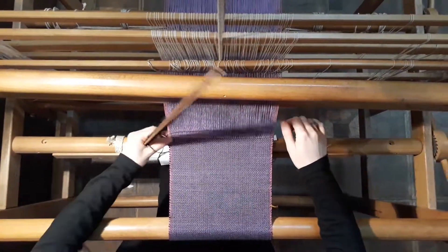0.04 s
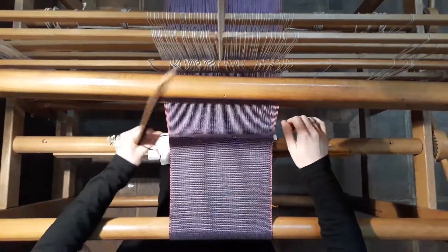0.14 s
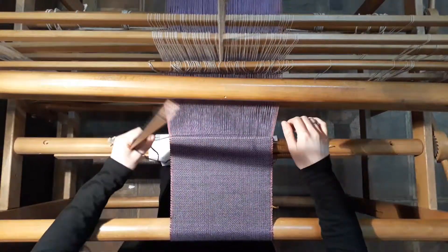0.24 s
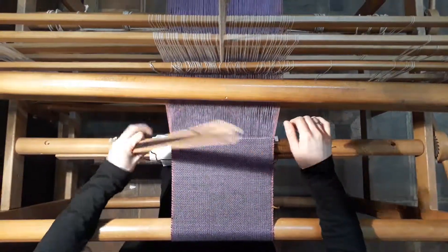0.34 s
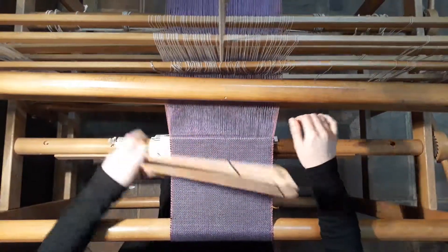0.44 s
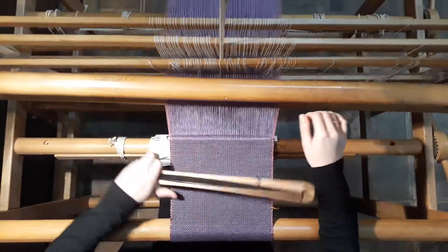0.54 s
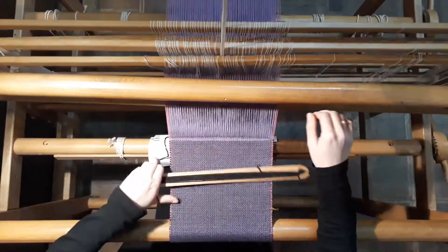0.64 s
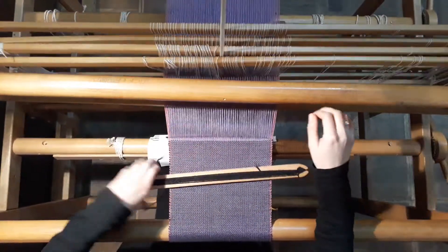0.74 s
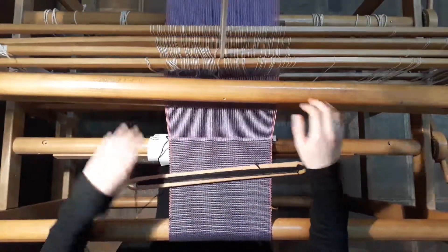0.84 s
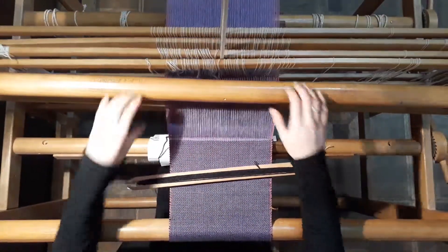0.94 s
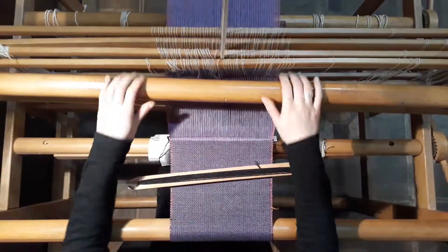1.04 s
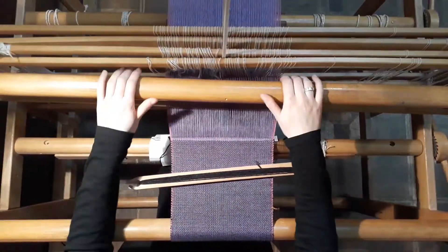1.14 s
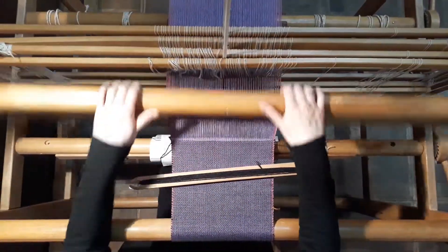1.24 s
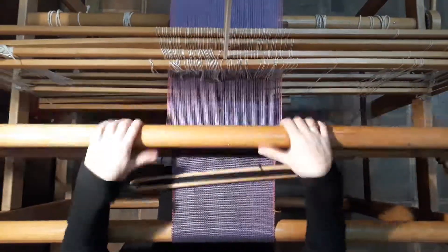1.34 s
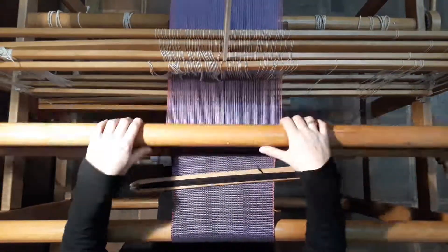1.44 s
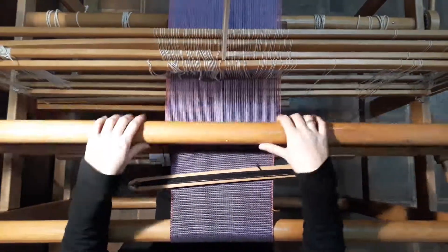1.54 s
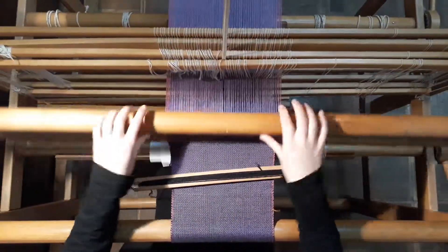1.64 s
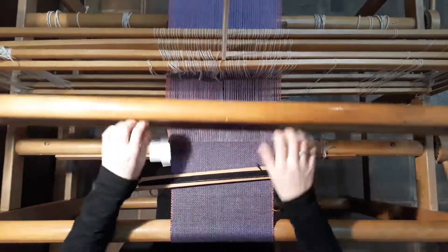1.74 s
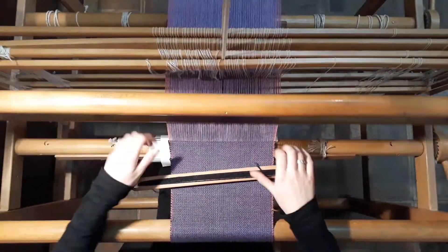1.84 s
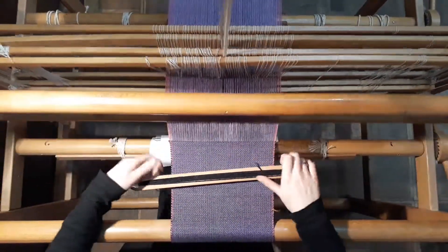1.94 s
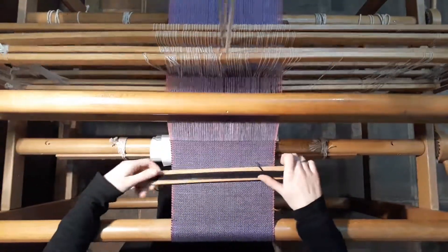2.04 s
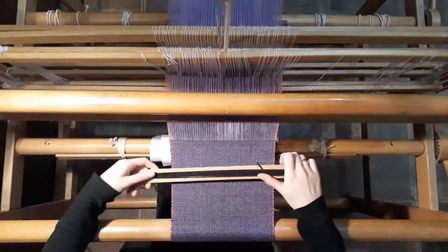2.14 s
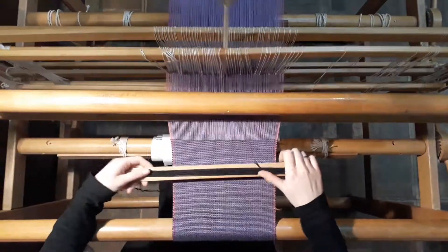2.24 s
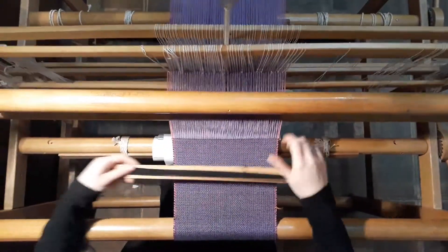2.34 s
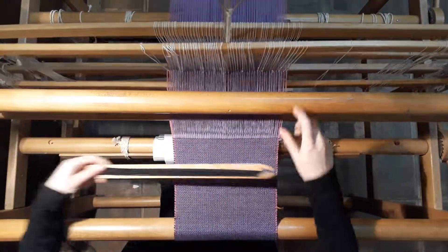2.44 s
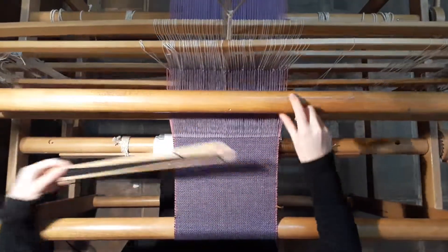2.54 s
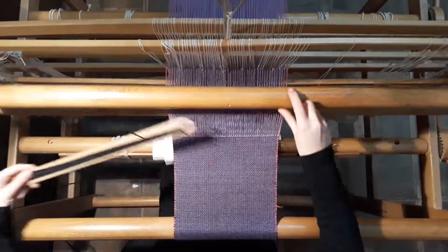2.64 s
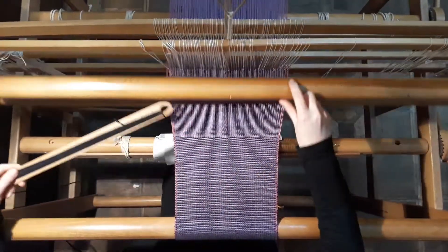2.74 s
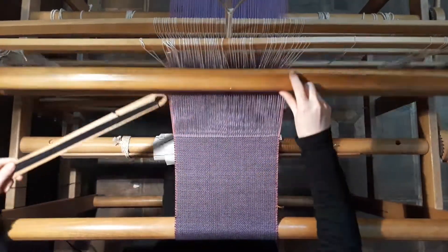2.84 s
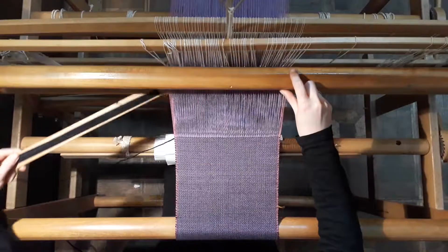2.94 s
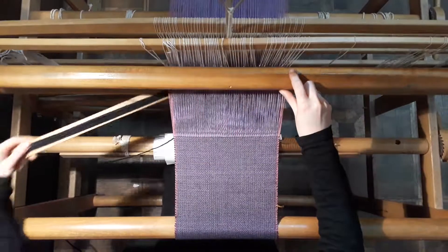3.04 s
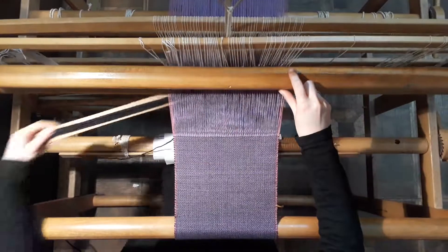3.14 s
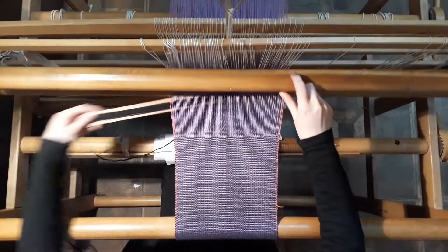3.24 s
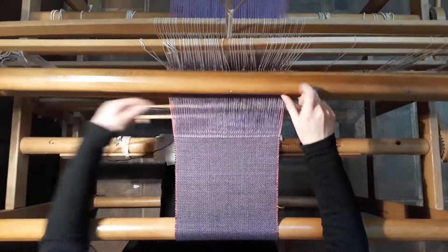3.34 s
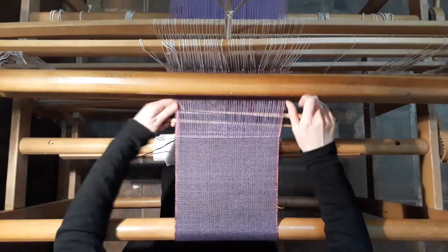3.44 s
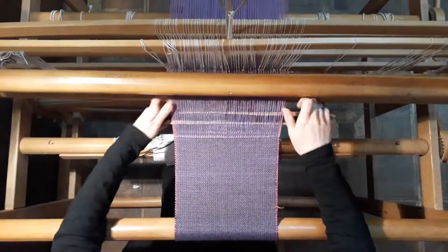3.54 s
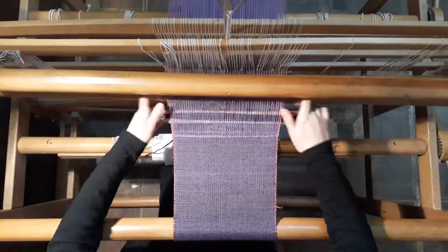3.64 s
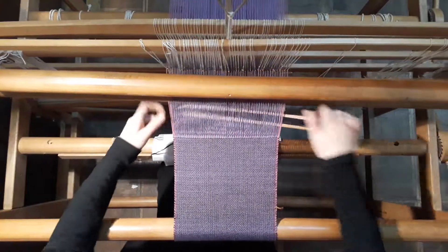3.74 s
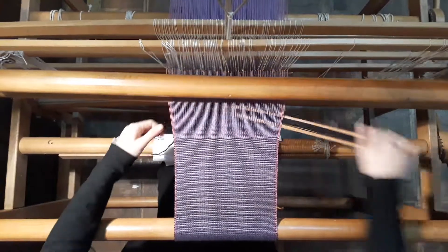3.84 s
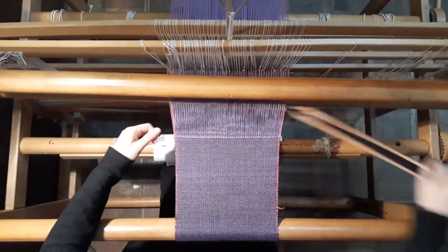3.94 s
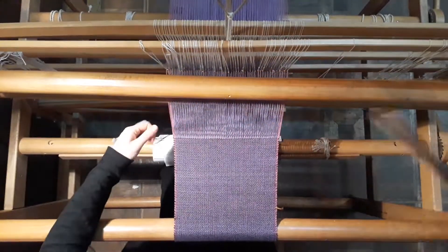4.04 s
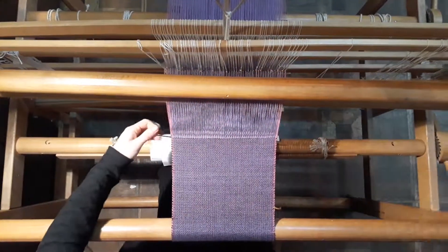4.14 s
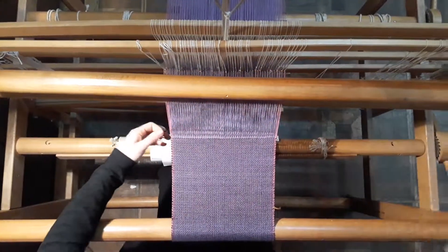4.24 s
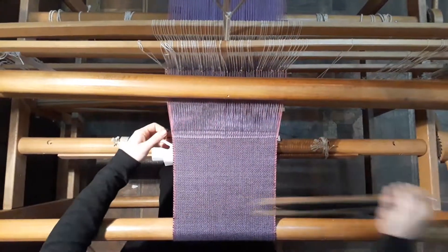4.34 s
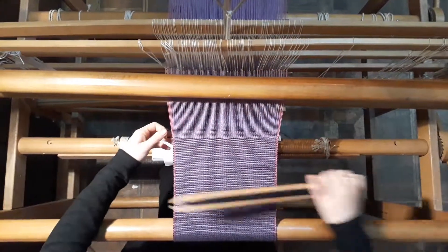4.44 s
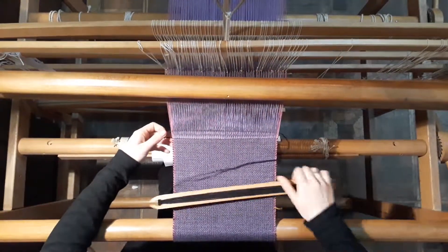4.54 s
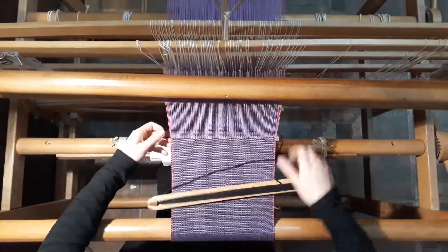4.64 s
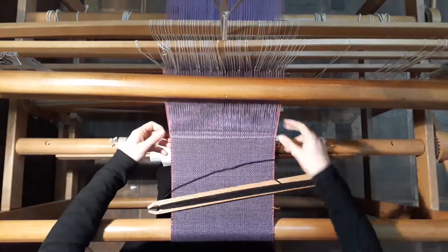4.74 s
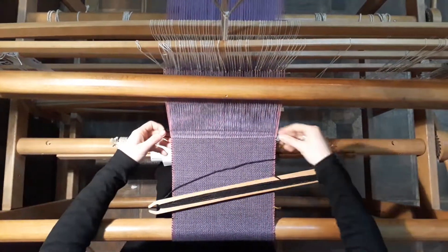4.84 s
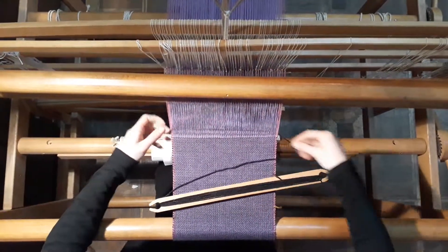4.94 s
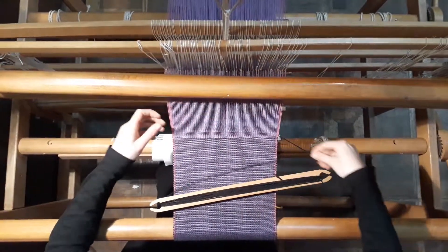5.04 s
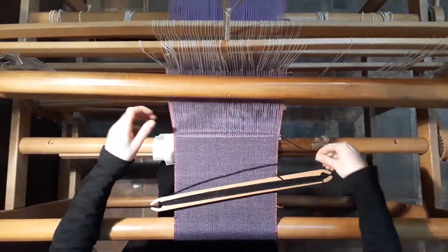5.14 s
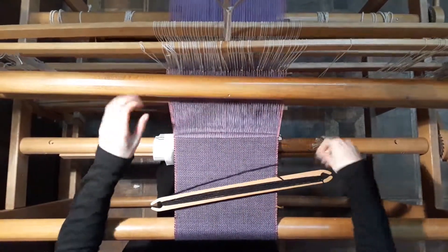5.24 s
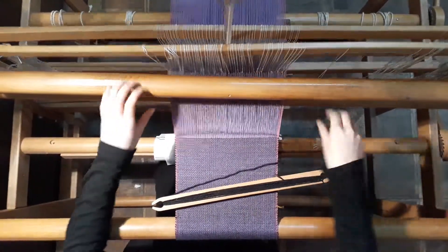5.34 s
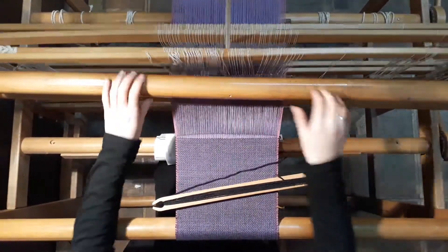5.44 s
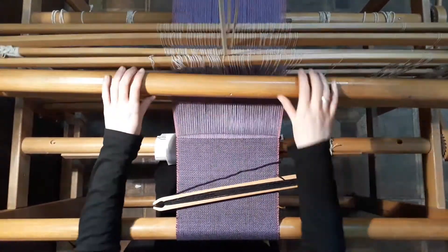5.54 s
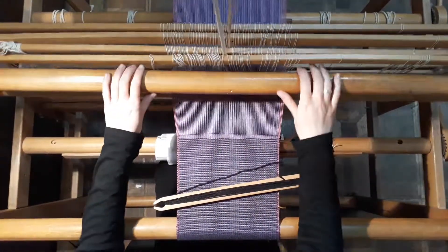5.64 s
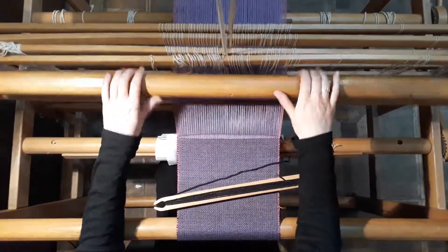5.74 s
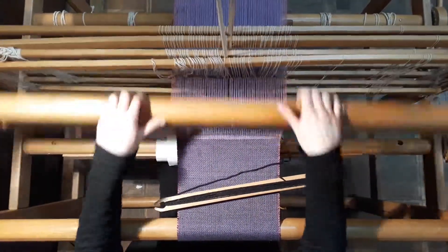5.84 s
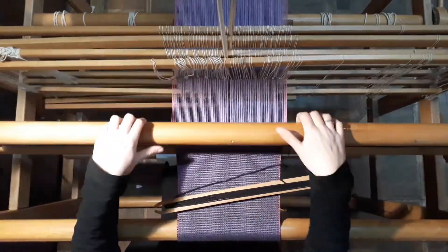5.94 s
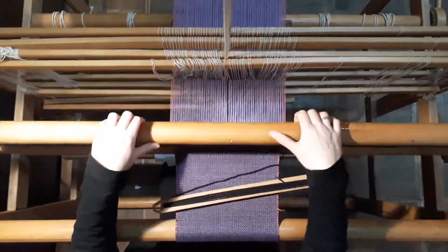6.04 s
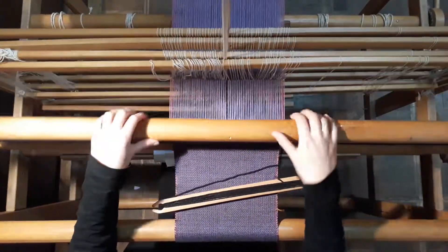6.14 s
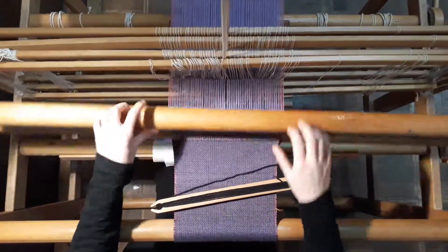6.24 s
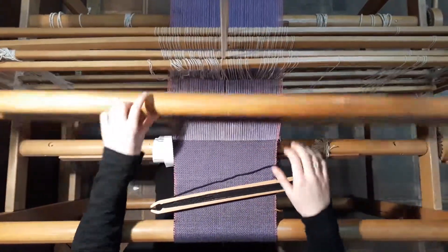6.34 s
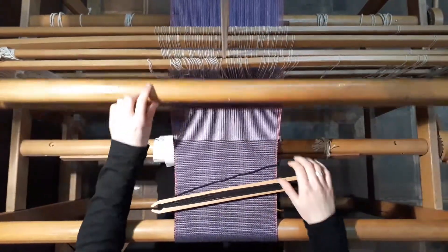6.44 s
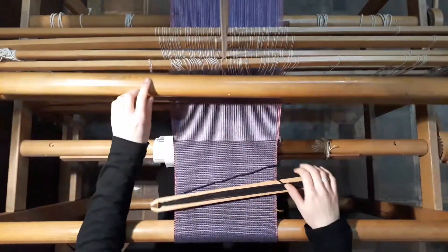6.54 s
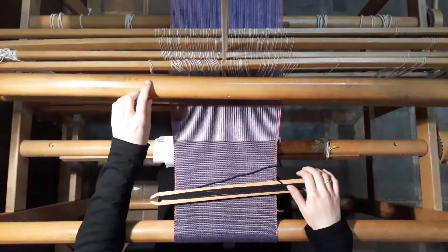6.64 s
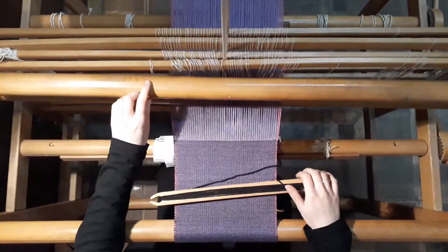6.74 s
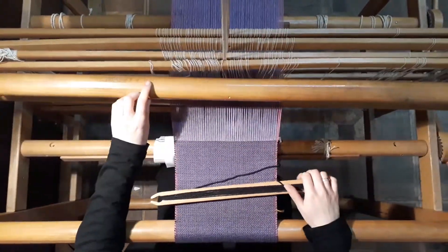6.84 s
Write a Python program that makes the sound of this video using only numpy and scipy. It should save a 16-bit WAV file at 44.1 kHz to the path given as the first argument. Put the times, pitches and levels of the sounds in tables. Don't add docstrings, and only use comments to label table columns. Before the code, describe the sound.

A hand-worked wooden loom knocks and rattles in a small hard room, two heavy beater strokes separated by quiet rustles and light shuttle taps.

```python
import sys
import numpy as np
from scipy import signal
from scipy.fft import rfft, irfft, next_fast_len
from scipy.io import wavfile
from scipy.ndimage import uniform_filter1d

SR = 44100
rng = np.random.default_rng(int(sys.argv[2]) if len(sys.argv) > 2 else 0)


def elevation(decibels):
    levels = np.asarray(decibels, float)
    return 10 ** (levels / 20)


def master_out(mix):
    frames = np.transpose(np.atleast_2d(mix))
    ceiling = np.clip(frames, -1, 1)
    pcm = np.round(ceiling * 32767).astype(np.int16)
    wavfile.write(sys.argv[1], SR, pcm)


N = 303408


def evened(x):
    return x / np.sqrt(np.mean(x ** 2) + 1e-20)


def read(points, hz):
    f, value = np.transpose(points)
    return np.interp(np.log(hz + 1), np.log(f + 1), value)


def colour(x, points):
    length = x.shape[-1]
    size = next_fast_len(length)
    gain = elevation(read(points, np.fft.rfftfreq(size, 1 / SR)))
    return irfft(rfft(x, size) * gain, size)[..., :length]


def add(mix, s, sound, lag=0):
    for side, sign in enumerate((1, -1)):
        part = mix[side, round(s * SR) + max(sign * lag, 0):][:len(sound)]
        part += sound[:len(part)]


def ring(hz, db, t60, seconds, phase=0.):
    t = np.arange(round(seconds * SR), dtype=np.float32)[:, None] / SR
    fall = np.exp(t * np.float32(-np.log(1000) / t60))
    wave = np.sin(t * np.float32(2 * np.pi * hz) + np.float32(2 * np.pi * phase))
    return (fall * wave) @ elevation(db)


def onset(length, rise_s):
    return 1 - np.exp(-np.arange(length) / SR / rise_s)


def grains(per_s, spread_db, ring_s=.012):
    luck = rng.random((2, N)) * SR / per_s + 1e-9
    size = elevation(spread_db * np.clip(-np.log(luck), 0, 4)) * (luck < 1)
    power = signal.lfilter([1], [1, -elevation(-120 / (ring_s * SR))], size ** 2)
    return np.sqrt(power) * rng.standard_normal((2, N))


def patchy(depth_db, seconds):
    span = round(seconds * SR)
    drift = uniform_filter1d(uniform_filter1d(rng.standard_normal(N), span), span)
    return elevation(depth_db * evened(drift))


def swell(peak_s, db, rise_s, fall_s):
    steps = np.arange(0, N + 128, 128)
    late = steps[:, None] / SR - peak_s
    power = elevation(db + 20 * np.where(late < 0, late / rise_s, -late / fall_s)) ** 2
    return np.interp(np.arange(N), steps, np.sqrt(power.sum(1)))


# pitch_hz, level_db
ROOM_TONE = [(12, -46), (20, -27.5), (74, -11.5), (93, -13), (126, -1), (176, -19.5), (325, -28),
             (354, -26), (467, -29), (2950, -43.5), (4730, -46.5), (5750, -49.5), (8040, -36.5),
             (15700, -42.5)]
ROOM_TONE_DB = -67


def still_room():
    return elevation(ROOM_TONE_DB + 3.0) * evened(colour(rng.standard_normal((2, N)), ROOM_TONE))


# start_s, length_s, first_hz, last_hz, level_db
HUM = [
    (2.86, 0.515, 131.4, 146.7, -58),
    (5.05, 0.33, 141.8, 133, -64),
]


def hum():
    out = np.zeros((2, N))
    for s, length, first_hz, last_hz, db in HUM:
        hz = np.linspace(first_hz, last_hz, round(length * SR))
        tone = np.sin(2 * np.pi * np.cumsum(hz) / SR)
        add(out, s, np.sqrt(2) * elevation(db) * tone * np.hanning(len(hz)))
    return out


# pitch_hz, t60_s
WALLS = [(120, 0.42), (330, 0.84), (870, 0.58), (2300, 0.64), (6000, 0.48), (14000, 0.26)]


def walls(x):
    taps = np.zeros((2, SR))
    at = np.arange(180, SR - 20, 20) + rng.integers(0, 20, (2, (SR - 181) // 20))
    np.put_along_axis(taps, at, rng.choice([-1., 1.], at.shape), 1)
    hz, t, z = signal.stft(taps, SR, nperseg=256)
    fading = z * elevation(-60 * t / read(WALLS, hz)[:, None])
    tail = signal.istft(fading, SR, nperseg=256)[1]
    return signal.fftconvolve(x.mean(0)[None], tail / np.linalg.norm(tail[0]), axes=1)[:, :N]


# pitch_hz, level_db, t60_s
TREADLE = [(91.5, 1.5, 0.18), (150.3, -10.5, 0.32), (224, -16, 0.17), (275, -15, 0.27), (291.5, -9, 0.21),
           (323, -13.5, .2)]
HEEL_S, HEEL_DB, HEEL_RISE_S = 4.547, -38.5, 0.0066


def heel():
    out, sound = np.zeros((2, N)), ring(*np.transpose(TREADLE), .4, .1)
    add(out, HEEL_S, elevation(HEEL_DB) * sound * onset(len(sound), HEEL_RISE_S))
    return out


# peak_s, rattle_db, build_up_s, creak_against_rattle_db
SHAKES = [(0.569, -46, 0.075, -10.5), (.67, -50.5, 0.15, -32), (0.778, -42, 0.097, -38),
          (0.886, -29.5, 0.18, -17.5), (1.09, -39, 0.29, -33.5), (1.43, -30, 0.13, -38),
          (1.529, -47, 0.11, 9), (1.63, -37.5, 0.16, -8.5), (1.879, -33.5, 0.084, -46.5),
          (2.052, -38, 0.091, -19), (2.24, -54.5, 0.4, -20.5), (2.49, -48, 1.73, -8.5),
          (2.6, -46, 0.46, -9.5), (2.88, -55, 0.35, -2), (3.401, -64, 0.46, 3.5), (3.15, -78, 0.3, 17.5),
          (3.56, -51.5, 0.47, -24), (3.72, -63, 0.29, -1), (4.499, -78.5, 6.6, 7.5),
          (5.08, -66.5, 0.31, -1), (5.23, -65.5, 0.18, -1.5), (5.46, -38.5, 0.1, -12.5),
          (5.65, -23.5, 0.19, -19), (5.98, -22.5, 0.091, -56), (6.05, -32, 0.18, -9),
          (6.19, -35.5, 0.15, -31), (6.55, -47, 0.35, -46), (6.759, -42.5, 0.75, -10.5)]
# peak_s, rustle_db, build_up_s, dying_s
GESTURES = [(0.05, -65.5, 1, 2.6), (.67, -45, 0.24, 0.51), (1.08, -59, 0.51, 0.48), (1.42, -37, 0.18, 0.25),
            (1.7, -54.5, 0.74, 1.2), (2.04, -42.5, 0.25, 1.16), (2.59, -72, 0.83, 0.11),
            (3.156, -56.5, 0.25, 0.82), (3.45, -51, 0.14, 1.3), (3.76, -43.5, 0.14, 0.24),
            (4.17, -75, 0.3, 0.15), (5.079, -64, 0.27, 1), (5.38, -41.5, 0.19, 0.29),
            (5.65, -49, 0.099, 0.44), (5.98, -35, 0.2, 0.23), (6.3, -57, 0.42, 0.7),
            (6.631, -51, 0.19, 0.15)]
# pitch_hz, level_db (per Hz)
RATTLE = [(290, -41), (500, -5.5), (627, 2), (1630, -1), (2890, -2), (4990, -14.5), (5780, -23.5),
          (8160, -22), (12000, -43.5), (15600, -80), (22000, -120)]
# pitch_hz, level_db (per Hz)
CREAK = [(120, -8.5), (200, 7.5), (400, 1), (800, -8), (1300, -41.5)]
# pitch_hz, level_db (per Hz)
RUSTLE = [(880, -47.5), (1500, -30), (5020, -11), (5540, -10.5), (5880, -12.5), (8050, -7), (9240, -11.5),
          (15700, -7)]
# ratio to the mode, level_db
ROD_BUMP = [(.94, -0.5), (1.0, 2.5), (1.06, 1.5)]
SETTLE_S, CREAK_SETTLE_S = 0.19, 0.23


def motion():
    s, db, rise_s, creak_db = np.transpose(SHAKES)
    bumps = [(hz * ratio, bump_db) for hz, _, _ in ROD[:5] for ratio, bump_db in ROD_BUMP]
    loose = evened(colour(colour(grains(420, 3.8, 0.04), RATTLE), bumps))
    rattle = swell(s, db - 8.0, rise_s, SETTLE_S) * loose
    rubbing = evened(colour(patchy(4.3, 0.036) * grains(410, 1.3, 0.02), CREAK))
    creak = swell(s, db + creak_db - 0.5, rise_s, CREAK_SETTLE_S) * rubbing
    fibres = evened(colour(patchy(2.9, 0.024) * grains(2500, 3.2, 0.011), RUSTLE))
    rustle = elevation(-1.1) * swell(*np.transpose(GESTURES)) * fibres
    return rattle + creak + rustle


# at_s, level_db, resonance_hz
SLIDE = [(2.92, -89, 2870), (2.996, -64.5, 2670), (3.058, -70.5, 2740), (3.214, -62.5, 3100),
         (3.29, -93, 2720), (3.34, -92, 2940)]


def shuttle():
    s, db, hz = np.transpose(SLIDE)
    t = np.arange(N) / SR
    turn = np.exp(2j * np.pi * np.cumsum(np.interp(t, s, hz)) / SR)
    r = np.exp(-np.pi * 850 / SR)
    band = (turn * signal.lfilter([1], [1, -2 * r, r * r], grains(3600, 1.5) / turn)).real
    return elevation(np.interp(t, s, db, -120, -120) + 1.0) * evened(band)


# start_s, peak_db, upper_modes_db
THUDS = [(0.797, -54, -8), (0.882, -45.5, -8), (0.979, -44, 12), (1.378, -25.5, -3), (1.423, -29.5, 11.5),
         (1.452, -16.5, 10), (1.472, -31, -9), (1.84, -47.5, 17.5), (1.947, -43.5, 9.5), (2.601, -54, -12),
         (2.801, -42, -6.5), (4.66, -47.5, 7), (5.632, -34, -3), (5.941, -25, -8), (5.978, -32.5, 15.5),
         (6.011, -18.5, 0.5), (6.046, -37.5, 13), (6.138, -32, -28), (6.66, -43.5, -35)]
# pitch_hz, level_db, t60_s
FRAME = [(50, -20, 0.2), (76.9, -11, 0.27), (109.1, 0, 0.13), (114.4, 7, 0.16), (141.3, -13, 0.51),
         (171.3, -11.5, 0.3), (218, -4, 0.1), (243.3, -3, 0.11), (298, -5.5, 0.068), (330, 11, 0.018)]


def frame():
    out, (hz, mode_db, t60) = np.zeros((2, N)), np.transpose(FRAME)
    for (s, db, upper_db), (phase, load) in zip(THUDS, rng.random((len(THUDS), 2, len(FRAME)))):
        sound = ring(hz * (0.985 + 0.04 * load), mode_db + upper_db * (hz > 185), t60, .4, phase)
        add(out, s - .01, elevation(db - 1.0) * sound * onset(len(sound), 0.043))
    return out


# grip_s, landing_s, shudder_db, softer_at_grip_db
STROKES = [
    (1.404, 1.474, -25.5, -4.5),
    (5.956, 6.037, -27.5, -6),
]
# pitch_hz, level_db (per Hz)
SHUDDER = [(180, -28), (300, -2.5), (528, -2.5), (739, 2), (884, -9), (1190, 0), (1280, -4), (2610, -4.5),
           (6500, -24), (8450, -60), (14300, -120)]
GRIP_S, STOP_S, FIZZ_DB = 0.013, 0.1, -4.5


def beater():
    t, gain = np.arange(N) / SR, 0
    shudder = evened(colour(grains(700, 2.0, 0.0064), SHUDDER))
    fizz = evened(colour(grains(1200, 1.3, 0.0063), RUSTLE))
    for grip, landing, db, soft_db in STROKES:
        times = [grip - 5 * GRIP_S, grip, landing, landing + 5 * STOP_S]
        course_db = np.interp(t, times, [soft_db - 100, soft_db, 0, -100])
        gain = gain + elevation(db - 1.5 + course_db)
    return gain * (shudder + elevation(FIZZ_DB) * fizz)


# start_s, peak_db, third_mode_hz, low_modes_db, sharpness_db
JOLTS = [(0.717, -38, 2738, 1, -22), (0.7658, -50.5, 2740, 19, -15), (0.849, -41, 2670, 7.5, -19),
         (0.8815, -52, 2630, 16, -22), (0.979, -35, 2625, 5, 5.5), (1.065, -51.5, 2590, 12, 10),
         (1.413, -34.5, 2660, -6, -18), (1.476, -45.5, 2630, 10.5, -6), (1.8362, -36, 2656, -1.5, -25),
         (1.9868, -25.5, 2637, -4, 2), (5.4011, -37.5, 2644, -2.5, -19), (5.4873, -35.5, 2627, -1.5, -28),
         (5.964, -30, 2700, -7, -21), (6.015, -39.5, 2634, 12, -7), (6.135, -27.5, 2660, -3, -12),
         (6.7115, -48, 2690, 10.5, -6), (6.5214, -49, 2705, -4, 3)]
# pitch_hz, level_db, t60_s
ROD = [(1186, -2, 0.49), (1823, 2.5, 0.4), (2607, 1, 0.52), (3550, -0.5, 0.2), (4490, -13.5, 0.31),
       (5130, -3, 0.27), (6050, -8, 0.37), (6980, 8.5, 0.037), (8000, -4, 0.16)]
TOP_MODES_DB = -0.5


def rod():
    out, (hz, mode_db, t60) = np.zeros((2, N)), np.repeat(ROD, 5, axis=0).T
    luck = rng.random((len(JOLTS), 2, 3, len(hz)))
    rise = onset(SR * 2 // 5, 0.0004)
    for (s, db, third_hz, low_db, high_db), pair in zip(JOLTS, luck):
        tilt = np.select([hz < 2200, hz < 3000, hz < 5600], [low_db, 0, high_db], high_db + TOP_MODES_DB)
        for side, (split, phase, size) in enumerate(pair):
            part = out[side, round(s * SR):][:len(rise)]
            mode_hz = (hz + (10.6 + 0.055 * hz) * (split - .5)) * third_hz / ROD[2][0]
            sound = ring(mode_hz, mode_db + tilt + 5 * size, t60, len(rise) / SR, phase)
            part += (elevation(db - 17.5) * rise * sound)[:len(part)]
    return out


# start_s, peak_db, lowest_hz
SPARKS = [(1.3585, -37, 7000), (1.4122, -30, 7000), (1.46, -33, 6000), (1.5235, -26, 6500),
          (1.5512, -18, 8500), (3.5406, -41.5, 2000), (5.5552, -33.5, 5500), (5.6048, -35, 3500),
          (5.9255, -28, 7000), (5.949, -34, 8000), (5.961, -29, 7500), (5.9815, -17.5, 7000),
          (6.0482, -15, 6500), (6.0545, -30, 7000), (6.0935, -23, 7000), (6.1475, -23, 6000),
          (0.9764, -32, 5500), (5.0386, -40, 3000), (6.523, -46, 1500), (6.624, -48, 1500),
          (6.7073, -49, 1200)]
SPARK_T60_S, SPARK_ECHO_DB = 0.0053, -8.5


def sparks(size=512):
    out, t = np.zeros((2, N)), np.arange(size) / SR
    for (s, db, low_hz), noise in zip(SPARKS, rng.standard_normal((len(SPARKS), size))):
        crack = evened(colour(noise, [(low_hz * .6, -25), (low_hz, 0), (16000, 3)]))
        add(out, s, elevation(db - 60 * t / SPARK_T60_S) * crack, lag=-8)
    return out


# start_s, peak_db, centre_hz, t60_s
SNAPS = [(0.467, -36.5, 9100, 0.0074), (0.7105, -39.5, 4070, .01), (1.118, -32.5, 10150, 0.0054),
         (1.186, -19, 8600, 0.0022), (1.3685, -42, 5820, 0.0073), (1.416, -30, 8000, 0.0035),
         (1.4135, -20, 2490, 0.013), (1.459, -14, 8000, 0.005), (1.4753, -27, 5240, 0.011),
         (1.55, -24, 10500, 0.0034), (1.734, -34, 3300, 0.0083), (1.754, -38, 3360, 0.01),
         (1.785, -38, 2700, 0.014), (1.8055, -42, 3550, 0.014), (1.836, -29, 3500, 0.012),
         (1.842, -28, 1470, 0.016), (1.864, -37, 3000, 0.011), (1.9857, -17, 6950, 0.011),
         (2.178, -25, 10200, 0.0031), (2.7735, -41, 8000, 0.0086), (2.7813, -25, 3430, 0.0038),
         (0.7675, -34, 1925, 0.021), (3.955, -66, 9500, 0.0067), (3.6131, -33, 3700, 0.0043),
         (3.8059, -26.5, 8000, 0.0049), (3.8088, -40.5, 5150, 0.016), (4.0324, -36, 7700, 0.0037),
         (5.0401, -29, 6600, .005), (5.1007, -27, 5720, 0.0067), (5.134, -34, 6900, 0.0066),
         (5.488, -31, 2240, 0.0061), (5.561, -27.5, 4670, 0.034), (5.605, -8.5, 6340, 0.0057),
         (5.6153, -15, 3000, 0.013), (5.627, -23, 3270, 0.0056), (5.9263, -25, 5700, 0.0039),
         (5.9493, -33, 4930, 0.0056), (5.961, -33, 8500, 0.0039), (5.9818, -12, 8000, 0.0042),
         (6.0158, -15, 7700, 0.0043), (6.0482, -15.5, 7000, 0.0046), (6.053, -20, 8000, 0.0042),
         (6.1475, -31, 8440, 0.0049), (6.3765, -55, 8000, 0.0078), (0.7902, -26.5, 5500, 0.0063),
         (6.45, -34.5, 5500, 0.0065), (6.706, -55, 4440, 0.0038), (6.47, -40, 6440, 0.0083),
         (6.637, -33.5, 9100, 0.0046), (6.6394, -46, 3700, 0.005),
         (0.59, -49, 1200, .015), (0.7175, -36, 2800, .02), (0.8485, -40, 3000, 0.0053),
        (0.7905, -33, 4900, 0.015), (0.99, -20.5, 5400, 0.0056), (1.1, -35, 1400, .008),
        (1.9, -34, 1450, 0.017), (1.462, -21.5, 737, .06), (1.425, -23.5, 3100, .012),
        (6.386, -42, 3840, .008), (6.519, -38, 4200, .006), (1.208, -35.5, 3400, .005),
        (3.352, -58, 1500, .04), (5.2, -56.5, 1400, 0.022), (1.4035, -26, 3670, 0.0094),
        (1.8362, -26, 2100, 0.014), (2.97, -47, 6300, 0.0081), (3.166, -53, 3000, 0.0099),
        (3.206, -61, 2600, 0.011), (3.806, -52, 2300, 0.017), (4.035, -49, 490, 0.11),
        (4.036, -55, 1800, 0.027), (4.741, -50, 530, 0.077), (4.739, -60, 1250, .04),
        (5.556, -18, 3500, 0.0058), (5.557, -25, 1800, 0.014), (5.6015, -23, 3700, 0.0054),
        (5.9172, -34, 4200, .008), (5.9606, -26, 3300, 0.011), (5.65, -33.5, 7700, 0.035)]
# ratio to the centre, level_db
SNAP_MODES = [(.55, 2), (.76, 2.5), (1.01, 8), (1.27, 4), (1.6, -0.5)]
# late_s, level_db
BEAM_ECHOES = [(.0011, -12.5), (.0023, -6.5), (.0032, -12.5), (.0047, -15), (.0066, -22.5)]
SNAP_ECHO_DB, SNAP_RISE_S = -3, .0003
SNAP_DAMPED = 1.6


def snaps():
    out, sent, (ratio, mode_db) = np.zeros((2, N)), np.zeros((2, N)), np.transpose(SNAP_MODES)
    for s, db, hz, t60 in SNAPS:
        spread = ratio ** np.clip(0.005 / t60, .05, 1.2)
        sound = ring(np.minimum(hz * spread, SR / 3), mode_db, t60, t60, ratio ** 2)
        t = np.arange(len(sound)) / SR
        sound = elevation(db - 9) * sound * onset(len(sound), SNAP_RISE_S)
        add(out, s, sound, lag=-8)
        add(sent, s, elevation(7.0 - 60 * SNAP_DAMPED * t / t60) * sound)
        for k, (late_s, echo_db) in enumerate(BEAM_ECHOES):
            add(out, s + late_s, elevation(echo_db) * sound, lag=(-1) ** k * 12)
    return out, sent


# start_s, peak_db, ring_hz, echo_db
TOUCHES = [(0.4075, -66, 7900, 10.5), (6.0485, -29, 4300, -16), (3.494, -54.5, 7660, 2.5),
           (4.1693, -60.5, 8000, 5), (4.5552, -66.5, 7960, 7.5), (5.018, -65.5, 7900, 14.5)]
# start_s, peak_db, ring_hz, echo_db
RAPS = [(3.3482, -48, 7200, 7), (3.8065, -45.5, 7720, -1.5), (4.0333, -49, 7770, 9.5),
        (4.7392, -53, 7500, 7.5)]
# start_s, peak_db, ring_hz, echo_db
TICKS = [(0.4668, -50, 8500, -9), (1.5251, -37, 2500, -8), (2.4659, -37, 2380, 0), (2.9897, -48, 5260, 5),
         (3.2101, -47, 8500, 6.5), (3.5406, -35, 8340, -2), (5.0386, -43, 8010, 1), (5.1007, -36, 8140, -1),
         (5.1327, -44.5, 4860, 9), (5.1474, -47, 3125, -7), (6.1475, -29.5, 8000, -17)]
# start_s, peak_db, ring_hz, echo_db
DROPS = [(2.5119, -23.5, 3710, 0)]
# start_s, peak_db, ring_hz, echo_db
STICKS = [(0.4837, -38, 3984, 2.5), (0.7668, -54, 2080, 6), (1.9859, -22.5, 2720, 11.5),
          (2.1774, -47, 2400, 8), (2.7524, -48.5, 2510, 9), (5.6045, -16, 4800, 7), (6.3844, -43, 3470, 1),
          (6.4486, -35, 3170, 4)]
# start_s, peak_db, ring_hz, echo_db
BLOWS = [(0.9783, -25, 1270, 7), (1.117, -39, 3460, 4.5), (1.1858, -36.5, 4380, 7),
         (1.3678, -22.5, 1970, 1.5), (1.4031, -30, 2120, 5), (1.4601, -19.5, 1030, -13),
         (2.4359, -42, 870, -20), (2.5994, -43, 4450, 7), (2.7804, -34, 1460, 7.5),
         (3.379, -43.5, 1080, -1), (3.613, -34, 3670, -3), (5.1624, -45, 5250, -5),
         (5.5548, -26.5, 1816, 15), (5.9485, -26, 1740, -17), (5.9614, -27, 2180, -14),
         (5.9792, -26, 1150, -4), (6.0147, -21.5, 1210, -2), (6.0935, -25, 1175, 2)]
# start_s, peak_db, ring_hz, echo_db
CLACKS = [(0.7896, -23, 3630, 1), (0.8489, -31, 2000, -7), (0.882, -24, 1216, -13),
          (1.0685, -32, 2580, -11), (1.207, -33.5, 3620, -24), (1.5535, -30.5, 2770, -21),
          (1.734, -42, 3120, 1), (1.7538, -36, 3800, -1), (1.7878, -43, 2500, -19),
          (1.8038, -37.5, 3620, -19), (1.8354, -31, 3520, 10.5), (2.3093, -41.5, 1470, -16),
          (2.6996, -40.5, 2405, -7), (5.4016, -33, 3030, 9), (5.488, -50, 2540, -15),
          (6.1371, -26.5, 2570, 11), (6.625, -31.5, 3740, 4), (0.7163, -36, 2080, -22),
          (6.5212, -32.5, 3800, 4), (6.7073, -27.5, 1970, -2.5)]
# events, treble_db, body_db
KINDS = [(TOUCHES, 7.6, 0), (RAPS, -0.34, 1), (TICKS, -3.5, -43.5), (DROPS, -8, -54),
         (STICKS, -13.5, -13.5), (BLOWS, -11, -3), (CLACKS, -35.5, -3.5)]
TICK_T60_S, RING_TO_WALLS = .012, .13


def knocks(size=2048):
    direct, sent, t = np.zeros((2, N)), np.zeros((2, N)), np.arange(size) / SR
    contact = onset(size, 0.00057)
    rows = [(*row, *kind) for events, *kind in KINDS for row in events]
    noises = rng.standard_normal((len(rows), 2, size))
    for (s, db, ring_hz, far_db, treble_db, body_db), noise in zip(rows, noises):
        bright = [(2500, -31.5), (6000, -7.0), (7500, 1.0), (9000, -5), (11000, -5.0), (16000, -7.5)]
        tick = evened(colour(noise[0], bright)) * elevation(treble_db + 14.5)
        body = [(250, body_db - 27.5), (450, body_db), (1300, body_db),
                (2000, -2.0), (5200, -3), (7000, -27.5)]
        crack = colour(noise[1], body) * elevation(8.5) * contact
        strong_db = np.interp(ring_hz, [1350, 1890, 5500, 6030], [body_db, 0, 0, treble_db - 1])
        tone = ring(np.array([ring_hz]), np.array([strong_db + 1.0]), 0.038, size / SR) * contact
        near = tick * elevation(-60 * t / TICK_T60_S) + crack * elevation(-60 * t / 0.053) + tone
        add(direct, s, elevation(db - 6.5) * near, round(9 * np.tanh(noise[1, -1]) - 5))
        far = tick * elevation(-60 * t / 0.0042) + crack * elevation(-60 * t / 0.024) + RING_TO_WALLS * tone
        add(sent, s, elevation(db - 5.5 + far_db) * far)
    return direct, sent


# pitch_hz, level_db
PORTS = [(60, -1), (250, -3.5), (4600, 2.5), (5250, -1.5), (5620, -8.5), (5900, -3.5), (8000, 1.5),
         (11000, -3), (16000, -12)]


def scene():
    hits, hits_sent = knocks()
    beams = frame() + heel()
    moving = motion() + beater() + shuttle() + rod()
    still = still_room()
    edges, edges_sent = snaps()
    cracks = sparks()
    sent = hits_sent + elevation(SNAP_ECHO_DB) * edges_sent + elevation(SPARK_ECHO_DB) * cracks + elevation(-6.0) * moving
    loom = colour(hits + edges + cracks + moving + walls(sent), PORTS)
    return loom + beams + elevation(-6.0) * walls(beams) + hum() + still


def top_cut(x):
    return signal.sosfilt(signal.butter(12, 16990, fs=SR, output="sos"), x)


# pitch_hz, side_level_db
SIDE_GAIN = [(30, -9), (100, -16.5), (250, -11.5), (500, -8), (1000, 0.5), (16000, -0.5)]
# pitch_hz, level_db
LEFT_RIGHT = [(60, -0.7), (300, 1), (700, 0.5), (1200, 1.3), (2500, -1), (5000, -6.5), (9000, -6.5),
              (14000, -3.5)]
# pitch_hz, level_db
EDGE = [(15800, 0), (16000, -30), (16900, -34), (17050, -70)]


def record(dry):
    mid, side = dry.mean(0), colour((dry[0] - dry[1]) / 2, SIDE_GAIN)
    left_lean = [(hz, db / 2) for hz, db in LEFT_RIGHT]
    right_lean = [(hz, -db) for hz, db in left_lean]
    pair = np.array([colour(mid + side, left_lean), colour(mid - side, right_lean)])
    return top_cut(colour(pair, EDGE))


dry = scene()
out = record(dry)
master_out(out)
```